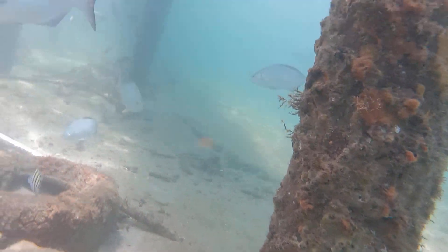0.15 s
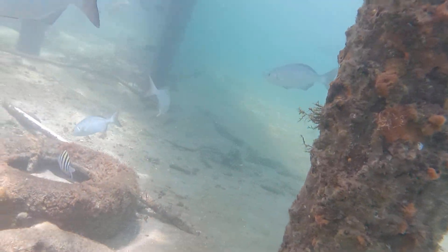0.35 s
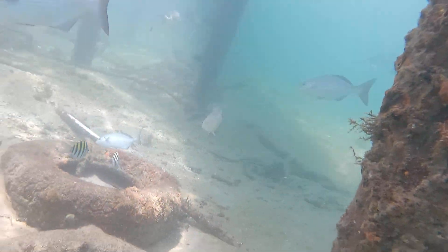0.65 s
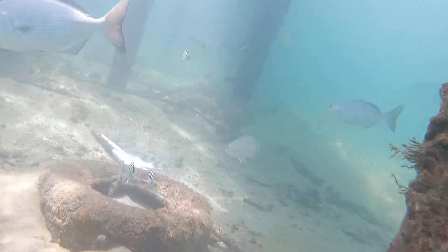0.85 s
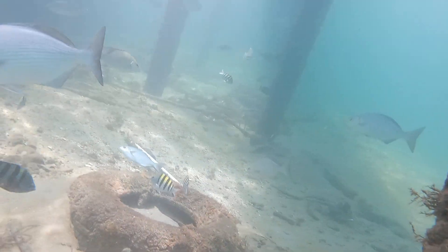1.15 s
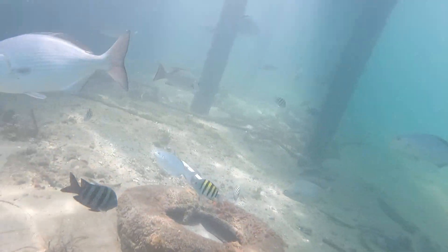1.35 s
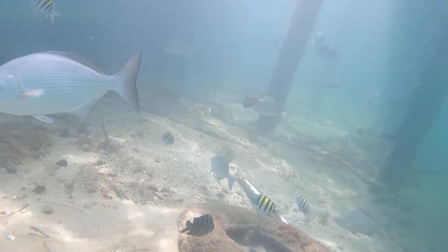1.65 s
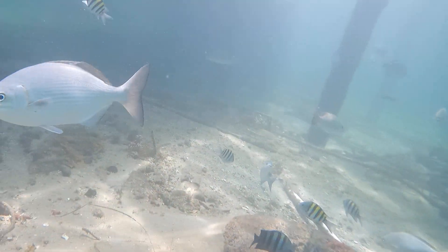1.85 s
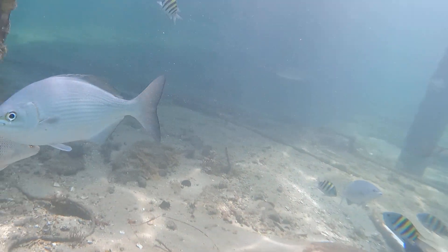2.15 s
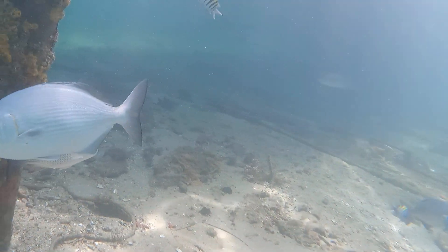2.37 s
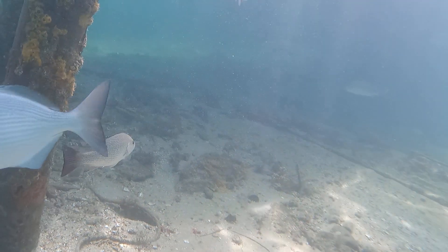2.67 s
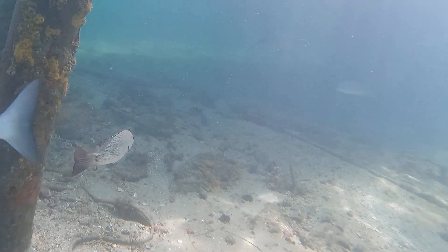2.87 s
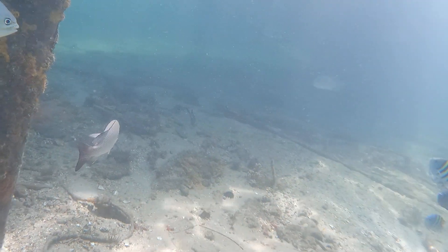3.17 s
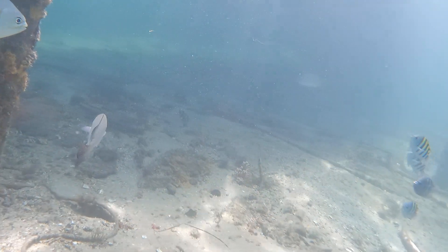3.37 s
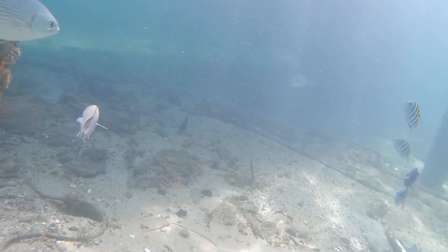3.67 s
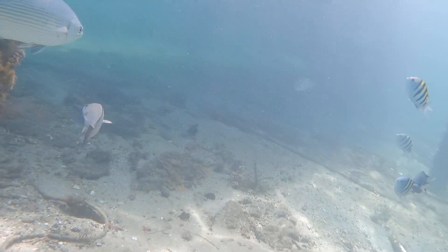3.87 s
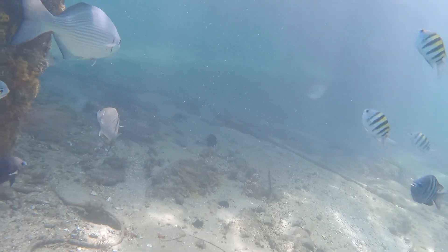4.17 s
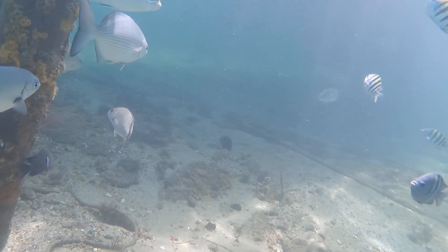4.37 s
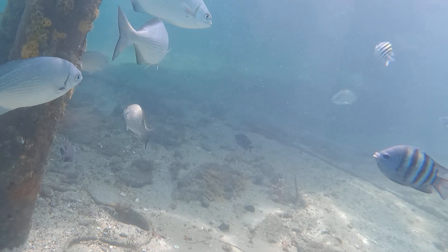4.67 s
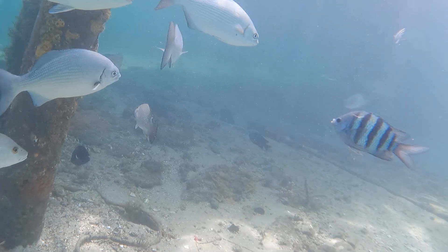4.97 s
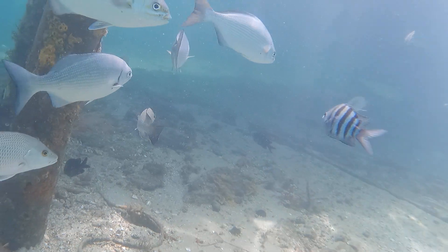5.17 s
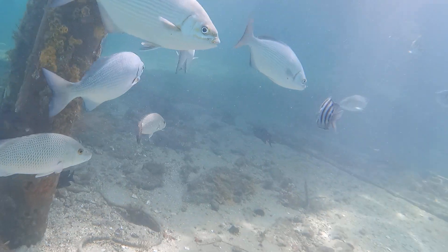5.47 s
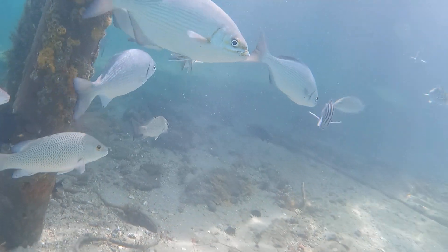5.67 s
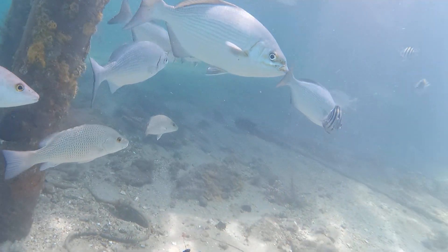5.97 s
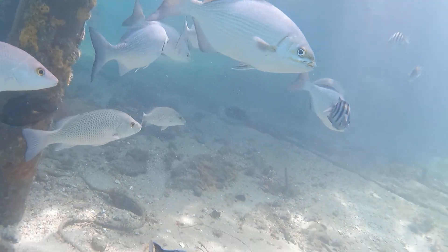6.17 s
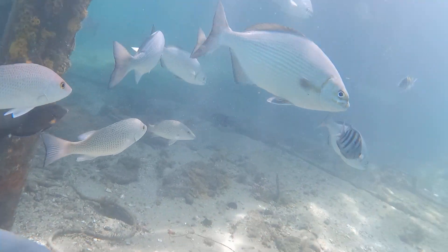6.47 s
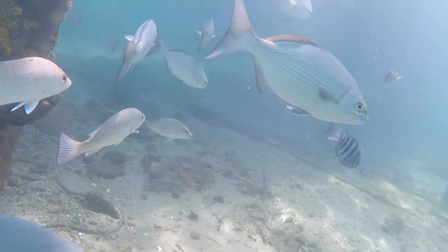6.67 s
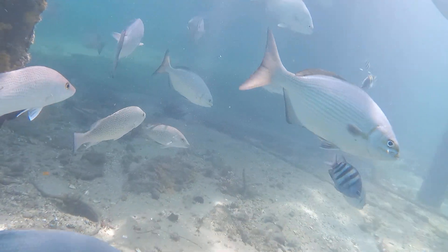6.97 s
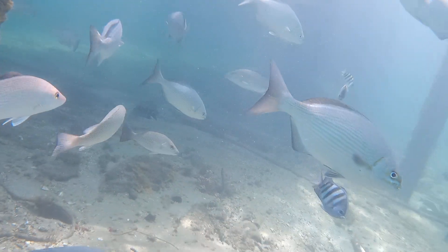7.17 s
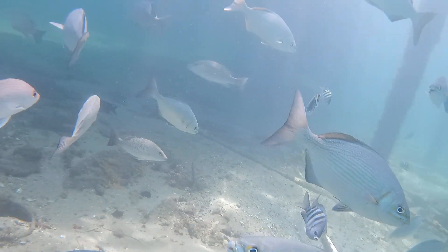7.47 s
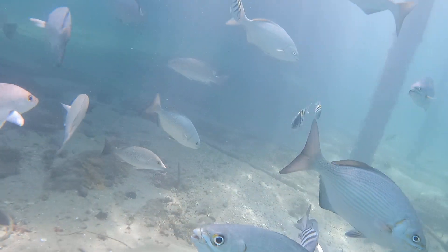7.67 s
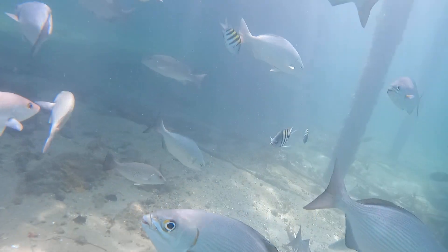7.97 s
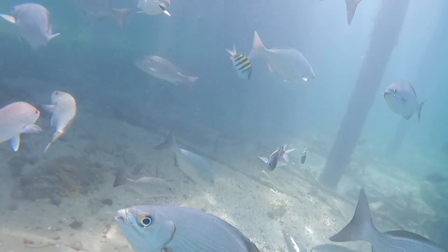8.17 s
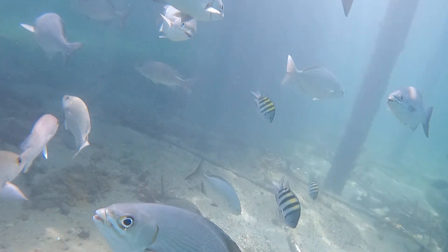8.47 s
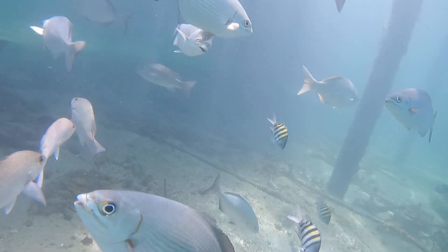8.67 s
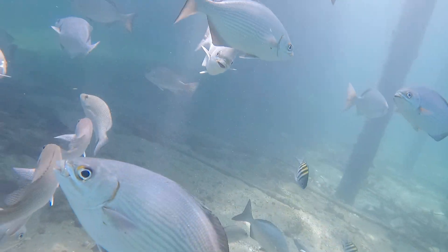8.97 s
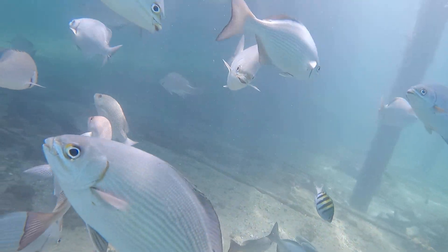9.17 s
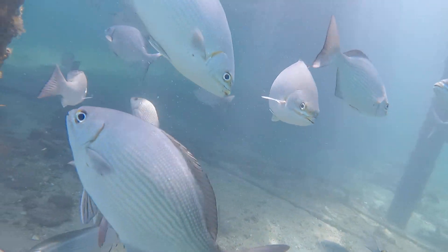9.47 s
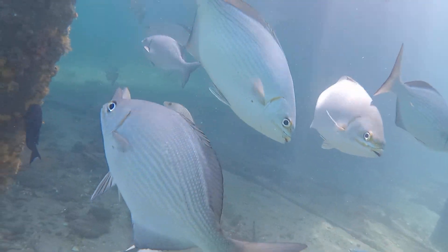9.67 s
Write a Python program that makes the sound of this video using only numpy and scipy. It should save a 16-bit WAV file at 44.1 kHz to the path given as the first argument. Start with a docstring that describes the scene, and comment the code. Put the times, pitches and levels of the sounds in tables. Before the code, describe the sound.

Snapping shrimp click and pop all around a submerged microphone, over a low, wavering drone of boat engines and a soft wash of water. The snaps are thickest at first, mixed with thumps and scrapes from a hand on the waterproof housing, then grow sparser. A thin whine comes and goes, a few bubbles plink, and a faint rasp flutters midway. Two more brief clusters of snaps and bumps follow, all with a dull, boxy ring.

```python
"""A sealed camera under a pier. From the start two boat engines hum and beat; far shrimp crackle and tick.
For 2 s near snaps crowd in, ringing the case, while the hand bumps and scrapes the grip; then both thin out.
From 0.8 s a thin whine comes in bursts, from 2.7 s a few bubbles plink. At 4.5-6 s a narrow rasp flutters,
and the right channel briefly fades to a second microphone port; otherwise both channels carry the first.
Snaps and grip noise bunch again near 6.5 s and 9.6 s."""
import sys
import numpy as np
from scipy import signal
from scipy.fft import rfft, irfft, next_fast_len
from scipy.io import wavfile
from scipy.ndimage import map_coordinates

SR = 44100
rng = np.random.default_rng(int(sys.argv[2]) if len(sys.argv) > 2 else 0)


def store_pcm(level_fs):
    """Save levels as 16-bit WAV."""
    pcm = np.round(np.clip(level_fs, -1, 1) * 32767).astype(np.int16)
    wavfile.write(sys.argv[1], SR, np.atleast_2d(pcm).T)


N = 433499

# engine tones, fading as the swell moves the surface: t/s, level/dB
HUM_SHAFT_X2 = [(0.0, -47), (0.13, -34), (0.71, -27), (0.82, -30.5), (2.161, -24.5), (3.26, -39),
                (3.94, -35.5), (5.45, -48), (6.949, -27), (7.56, -38.5), (8.21, -27), (9.28, -32),
                (9.64, -44), (9.83, -40)]
HUM_SHAFT_X3 = [(0.0, -20), (0.079, -17), (0.19, -57), (0.38, -19.5), (0.79, -23), (0.87, -34), (1.04, -21),
                (1.311, -28.5), (2.35, -20), (2.432, -27.5), (3.94, -20), (4.24, -41.5), (4.82, -14),
                (4.98, -20), (5.23, -12), (5.941, -24), (6.18, -19), (6.841, -35), (7.12, -18), (7.58, -32),
                (7.72, -22), (7.88, -41), (8.43, -28), (8.51, -37), (8.93, -17), (9.06, -34), (9.331, -20),
                (9.46, -22), (9.53, -22), (9.62, -24), (9.83, -23)]
HUM_SECOND_ENGINE = [(0.0, -26), (0.3, -19.5), (0.41, -58), (0.57, -22.5), (0.63, -30), (1.119, -23),
                     (1.72, -45), (2.02, -27), (2.3, -32), (3.78, -23), (4.239, -31), (5.8, -48.5),
                     (5.89, -41), (6.069, -28.5), (7.34, -21), (7.86, -34), (8.43, -24), (8.65, -30),
                     (8.9, -30.5), (9.02, -39), (9.2, -30), (9.45, -19.5), (9.53, -34), (9.62, -21),
                     (9.83, -40)]
# nearer engine's overtones: shaft multiple, level/dB
OVERTONES = [(4, -45), (5, -50), (6, -53), (7, -54), (8, -56), (14, -56.5), (15, -59), (16, -55)]
# background levels: t/s, crackle/dB, wash/dB, rumble/dB
BACKGROUND = [(0.0, -36, -43, -20), (0.19, -41.5, -43, -27), (0.66, -39.5, -42.5, -26),
              (0.82, -40.5, -38.5, -24.5), (1.07, -42, -41.5, -27.5), (1.29, -40.5, -39, -21.5),
              (1.45, -42.5, -43.5, -26), (1.91, -40.5, -41, -26), (4.08, -47, -44, -32),
              (4.54, -45, -42.5, -26.5), (5.17, -47.5, -41.5, -29.5), (5.83, -51, -48, -34),
              (6.21, -46.5, -47.5, -31.5), (6.54, -43.5, -42, -28.5), (7.39, -45, -45.5, -32),
              (8.73, -42.5, -41, -30), (9.36, -44, -43.5, -35.5), (9.83, -44.5, -41, -27)]
# noise spectra: f/Hz, density/dB
RUMBLE_SPECTRUM = [(20, -14.5), (45, -14), (62, -5.5), (90, 2.5), (125, 0), (160, -9.5), (300, -21),
                   (420, -37), (700, -120)]
WASH_SPECTRUM = [(150, -39), (300, -4), (450, -3.5), (520, 0.5), (650, -0.5), (780, -3.5), (870, -16),
                 (1200, -18), (2000, -31.5), (4000, -49), (9800, -48), (11200, -91.5)]
# whine bursts: t/s, length/s, level/dB
WHINES = [(0.797, 0.32, -47), (1.878, 0.23, -40.5), (2.698, 0.46, -47.5), (3.35, 0.29, -46.5),
          (4.01, 0.78, -50.5), (4.784, 0.76, -48), (6.096, 0.88, -46.5), (7.493, 0.6, -48),
          (8.303, 0.68, -47)]
# rasp envelope: t/s, level/dB
RASP_LEVEL = [(4.5, -49), (4.554, -50.5), (4.688, -52), (4.87, -61.5), (5.288, -50), (5.36, -56),
              (5.518, -56.5), (5.664, -68.5), (6.0, -60.5)]
# case modes, grouped low, mid, upper, treble: f/Hz, width/Hz, gain/dB
CASE_MODES = [
    [(413, 380, 1.5), (710, 655, 4.5)],
    [(1027, 270, -4), (1454, 170, 0), (1723, 480, 3)],
    [(2312, 202, -2.5), (2735, 782, 10.5), (3179, 1180, 11.5), (4480, 890, -8)],
    [(4720, 290, -6.5), (5464, 730, 6), (5940, 685, 7), (8650, 1600, -3.5)],
]
# dry ticks: t/s, level/dB, mid offset/dB, treble offset/dB
TICKS = [(0.1492, -38, -5, -22), (0.3837, -32, 8, -26), (0.437, -23.5, -1, -26), (0.5236, -32, 1, -27),
         (1.3227, -26.5, 1, -9), (1.5299, -27, -3.5, -19), (1.6077, -27, 7, -28), (1.981, -29, -6, -13.5),
         (2.0231, -35, -8, -9), (2.1059, -35, -6, -9), (2.144, -29.5, 2, -31), (2.207, -29, -3, -25),
         (2.263, -27, -6, -22), (2.314, -33, -6, -32), (2.366, -26.5, 7, -31), (2.4723, -42, -9, -23),
         (2.814, -32, 2, -19), (2.9658, -40, 18, -37), (3.0543, -31.5, -2, -35), (3.103, -42, -3, -37),
         (3.1335, -41, -3, -31), (3.172, -33, -10, -37), (3.33, -35, -5.5, -25), (3.3703, -32.5, -5, -15),
         (3.3927, -31.5, 3, -21), (3.409, -28, -14, -36), (3.5065, -44, 5, -28), (3.5725, -29, 1, -20),
         (3.6549, -31, 5, -35), (3.7586, -33, 7.5, -25), (3.847, -30, -15, -26), (4.012, -30.5, -10, -25),
         (4.0754, -32.5, -2, -17.5), (4.1739, -25, -11, -37), (4.3158, -39, -10, -30),
         (4.362, -30, -7, -21), (4.742, -43, -5.5, -20), (4.7602, -30.5, 8, -26), (4.8396, -34, -5, -20),
         (5.2165, -26, -14, -24), (5.271, -33, -10, -21), (5.3124, -36, 3, -26), (5.88, -36, -5, -11),
         (5.9886, -38.5, -7, -16), (6.0418, -26, -12, -30), (6.205, -33, -7.5, -29), (6.2354, -35, 1, -14),
         (6.519, -29.5, -6, -28), (6.595, -33, 5, -24), (6.6355, -28.5, 11, -19), (6.6532, -22, 9.5, -33),
         (6.725, -33, -9, -24), (6.791, -28, -9, -31), (6.865, -35, -5, -20.5), (7.249, -38, -7, -11),
         (7.4383, -38, -5, -19), (7.5007, -41, -6, -29), (7.7174, -44, -1, -32), (7.734, -30, -3, -30),
         (7.836, -36.5, 0, -11), (7.9617, -36, -8, -35), (8.107, -35, -6, -22), (8.1658, -39, -1, -30),
         (8.2386, -28, -3, -34), (8.338, -33, -5, -22), (8.5575, -36, 10, -28), (8.5845, -40, -15, -31),
         (8.6025, -27, -13, -37), (8.755, -37, -1, -37), (9.0282, -42, 0, -33), (9.103, -37, -15, -30),
         (9.195, -37, 2, -26), (9.338, -31, -4, -37), (9.4963, -42, -2, -35), (9.5913, -35.5, -4, -25),
         (9.685, -33.5, 4, -37), (9.7426, -32, -5, -14)]
# bubbles: t/s, level/dB, f/Hz, t60/s
PLINKS = [(2.662, -12.5, 730, 0.028), (2.991, -17, 2540, 0.021), (2.992, -17.5, 1500, 0.046),
          (4.765, -31, 1476, 0.047), (5.101, -31, 1416, 0.091), (5.56, -34, 1500, 0.046),
          (9.42, -25, 1490, 0.051)]
# grip bumps, and the low thud under a few snaps: t/s, level/dB, f/Hz, t60/s
BUMPS = [(0.237, -34, 203, 0.073), (0.269, -30.5, 36, 0.37), (0.849, -12.5, 32.6, 0.3),
         (0.9, -14.5, 243, 0.028), (1.19, -20, 33.5, 0.14), (1.342, -13, 200, 0.028),
         (1.437, -11.5, 49, 0.12), (2.386, -24, 593, 0.016), (2.989, -24, 780, 0.027),
         (4.512, -23, 340, 0.023), (4.615, -11, 242, 0.012), (4.641, -8, 220.9, 0.02),
         (4.695, -22.5, 590, 0.013), (6.477, -4, 344, 0.0051), (6.507, -19, 182, 0.046),
         (6.616, -11, 47.2, 0.07), (6.653, -24, 520, 0.016), (7.235, -29, 346, 0.032),
         (8.051, -34, 38.6, 0.18), (9.063, -19, 54, 0.24), (9.607, -22, 373, 0.016),
         (9.619, -19.5, 31.4, 0.088)]
# grip scrapes: t/s, length/s, level/dB, ring f/Hz
SCRAPES = [(0.212, 0.064, -31, 2180), (0.279, 0.048, -33.5, 2460), (0.52, 0.035, -37, 2300),
           (0.613, 0.037, -40, 2440), (0.666, .09, -41, 2380), (0.764, 0.032, -26, 2450),
           (0.833, 0.077, -30.5, 2240), (0.92, 0.062, -37, 2390), (1.273, 0.031, -37, 2260),
           (1.311, 0.052, -33, 2200), (1.376, 0.09, -33.5, 2730), (1.659, 0.026, -42, 2340),
           (1.871, 0.044, -29.5, 2530), (6.402, 0.03, -39.5, 2900), (6.44, 0.04, -38.5, 2030),
           (6.498, 0.025, -37.5, 1220), (7.218, 0.043, -39.5, 1530), (9.6, 0.048, -40, 2300)]
# near snaps: t/s, level/dB, ring f/Hz, low offset/dB, upper offset/dB, treble offset/dB
SNAPS = [(0.032, -28, 1010, -10, 0.5, -24), (0.216, -18.5, 1236, -11, -12, -25.5),
         (0.237, -15.5, 1160, -17, -21, -26), (0.2458, -19, 1010, 1, -14, -28),
         (0.2559, -20, 1480, -7.5, -15, -34), (0.288, -28, 1540, 0, -3, -20),
         (0.3107, -21, 1480, -5.5, -6.5, -30), (0.3216, -11.5, 2150, -18, -24, -31.5),
         (0.3583, -22.5, 2470, -4.5, -21, -38), (0.416, -13, 1510, -10, -14.5, -33),
         (0.4486, -14.5, 1205, -7.5, -5.5, -36), (0.493, -19, 1460, -30, -18, -41.5),
         (0.6121, -13.5, 1570, -12, -23, -34), (0.641, -19.5, 2520, -8, -7.5, -28),
         (0.665, -16.5, 1400, -9, -5, -28), (0.6889, -13, 2300, -22, -12, -21.5),
         (0.7143, -15, 1210, -20, -10, -41), (0.731, -18.5, 2200, -9.5, -18, -39),
         (0.775, -11, 2360, -10, -30, -31), (0.7828, -10.5, 2240, -23, -9, -18.5),
         (0.8178, -19, 2350, -15, -10, -27), (0.8548, -13.5, 1080, -19, -16, -31),
         (0.8617, -7, 1190, -14, -17, -23.5), (0.8732, -16.5, 1180, -11, -18.5, -32),
         (0.8871, -14, 2190, -24, -9, -29), (0.8987, -15, 2280, -6, -16, -30),
         (0.9356, -33, 1400, -16, -22, -24), (0.9841, -22, 1400, -3, -32, -44),
         (1.0467, -20.5, 1530, -19, 0.5, -33), (1.0994, -26.5, 2340, -5, -6, -39),
         (1.1682, -24.5, 1590, 0.5, -5.5, -19), (1.269, -25.5, 1420, 1, -21, -29),
         (1.2836, -14, 2220, -19, -21, -42), (1.2947, -19, 1490, -2, -23, -34),
         (1.342, -10, 1370, -5, -23, -52), (1.379, -20.5, 1090, -5, -14, -37),
         (1.403, -12.5, 1430, -7, -2, -31), (1.427, -15, 1400, -11, -14, -28),
         (1.441, -8, 1500, -19, -11.5, -33), (1.4586, -15.5, 2210, -8, -23, -34),
         (1.521, -15.5, 1620, -2, -9, -35), (1.547, -12, 1230, -32, -14, -21),
         (1.5809, -14.5, 1200, -10, -3, -38), (1.6337, -10, 1350, -24, -25, -46),
         (1.6497, -16, 1240, -11, -13, -40), (1.6737, -11.5, 2160, -6, -7.5, -29),
         (1.8443, -19.5, 2370, -11, -4, -20), (1.8831, -21.5, 1900, -10, -22.5, -38),
         (1.8963, -19, 2450, -14, -4, -23.5), (1.9245, -15.5, 1510, -20, -8, -32),
         (2.0037, -39.5, 1600, -4, 10.5, -8), (2.1679, -22, 1400, -36, 3, -26.5),
         (2.2398, -17, 1430, -15, -14, -38), (2.3831, -15.5, 1270, -10.5, -21, -47),
         (2.395, -26, 1420, -15, -20.5, -38), (2.593, -27, 1450, -9, -2, -36),
         (2.651, -37, 2380, 11, -11, -50), (2.66, -11.5, 1595, -14, -18, -42),
         (2.6773, -16, 1410, -15, -15, -39), (2.6954, -24, 1230, -27, -3, -26.5),
         (2.928, -24, 1180, -13, -33, -39), (2.9881, -7.5, 1510, -20.5, -18, -49),
         (3.2918, -21.5, 1650, -13, -4.5, -28.5), (3.3083, -32, 2370, -11, 4, -39),
         (3.3505, -31, 1380, -8, -5, -25.5), (3.612, -25.5, 1580, -17, -14, -45.5),
         (3.672, -21, 1460, -9, -10.5, -38), (3.775, -28.5, 1515, -13, 1, -24),
         (3.7927, -16.5, 2370, -24, -6, -32), (3.988, -27.5, 1380, -15, -9, -30),
         (4.2507, -31, 1420, -21, 2, -30), (4.333, -35.5, 1370, -13, 3.5, -22),
         (4.6444, -30, 1610, -9, 0, -19), (4.773, -41, 1220, -8, -8.5, -23),
         (4.7866, -27.5, 993, -17, -3, -27), (5.098, -20.5, 1490, -23.5, -16, -38),
         (5.2283, -27.5, 1470, -5.5, -3, -22.5), (5.448, -26.5, 1590, -11, -27, -28),
         (5.642, -26, 940, -15, -31, -34.5), (5.7614, -27, 1350, -12, -13.5, -29),
         (5.8492, -27, 2640, -25, -1.5, -43), (6.063, -32, 1045, -20, -4.5, -29),
         (6.324, -24.5, 1370, -3.5, -13, -30), (6.4042, -27.5, 1620, -19, -2, -31.5),
         (6.4295, -31, 1740, -4, -18.5, -27), (6.451, -29.5, 1200, -5, -15, -20),
         (6.46, -23, 895, -8.5, -8, -36), (6.474, -19.5, 1530, -19, -16, -43),
         (6.5035, -21, 1300, 4, -24, -37), (6.6187, -21, 1470, -3.5, -10, -29),
         (6.6527, -14, 1390, -1.5, -16, -42), (6.7633, -23.5, 1490, -27.5, -3.5, -26),
         (6.8356, -35, 2370, -10, -6, -30), (6.95, -29.5, 1430, -2.5, -4.5, -25),
         (7.066, -34, 1680, -5, -0.5, -36), (7.232, -24.5, 1400, -12, -17, -40),
         (7.2401, -23, 1660, -5, -14, -38), (7.2542, -29, 993, -6, -12, -28),
         (7.329, -19, 1450, -6.5, -7.5, -30), (7.4114, -28.5, 1240, -13, -18, -36),
         (7.4746, -22, 1450, -25, -6.5, -25), (7.642, -25, 1380, -12, -14, -35),
         (7.75, -27.5, 1390, -24, -4, -33), (7.9327, -29, 1420, -10, -3, -30),
         (8.0323, -19.5, 1410, -9, -14, -53), (8.065, -29.5, 1400, -4, -7, -37),
         (8.198, -26.5, 1150, -12.5, -12, -42), (8.209, -21.5, 1450, -11, -5.5, -28),
         (8.327, -20.5, 1410, -2, -8.5, -33), (8.3786, -23, 1360, -5, -3.5, -30),
         (8.5022, -22.5, 1460, -0.5, -8, -28), (8.7232, -26, 1460, -20, -5.5, -27),
         (8.799, -25, 1510, -14, -7, -43), (8.8284, -26.5, 1480, -17, -1, -41),
         (8.876, -28.5, 1470, -4, -12.5, -38), (8.95, -33.5, 1440, -8, 4.5, -12.5),
         (9.121, -21.5, 2540, -11, -10, -37), (9.2098, -27.5, 1340, -5, -9, -30),
         (9.417, -20.5, 1550, -18, -25, -43), (9.605, -17.5, 2180, -4, -10.5, -24),
         (9.62, -16, 1210, -9, -12, -32), (9.646, -30.5, 1430, 0, 1.5, -38),
         (9.7266, -23, 1580, -19, -6.5, -31)]
# second port re first: f/Hz, gain/dB, lead/rad
PORT_RESPONSE = [(0, -1.6, 0), (900, -3, 1), (1200, -10, -.3), (1480, 2, .7), (1750, 1, 2.8), (2000, 10, 6),
                 (2250, 3, 5.4), (2700, 2.5, 7), (3000, -6, 6.5), (3400, 4, 5), (4200, 12, 5.8),
                 (6300, 8, 8), (7100, 17, 8.4), (8600, 11, 8.4)]

# drive per case group; ticks skip the low one
CRACKLE_DRIVE_DB, TICK_DRIVE_DB = [-3, 3.5, 3, 16], [-2, 4, 17]
SCRAPE_DRIVE_DB, SNAP_DRIVE_DB = [1.5, 4.5, 1, -1], [8, -6.5, 8, 19]
SHAFT_HZ, SECOND_ENGINE_HZ = 36.5, 101.7
TIME_S = np.arange(N) / SR


def amp(db):
    """dB to gain."""
    return 10 ** (np.asarray(db) / 20)


def unit(x):
    """Scale to rms 1."""
    return x / np.sqrt(np.mean(x ** 2) + 1e-20)


def curves(rows):
    """Per-sample curve of each column after t/s."""
    t_s, *columns = np.transpose(rows)
    return [np.interp(TIME_S, t_s, column) for column in columns]


def wobble(rate_hz):
    """Smooth random curve, knots at rate_hz."""
    knots = rng.standard_normal(int(N * rate_hz / SR) + 4)
    return map_coordinates(knots, [np.arange(N) * rate_hz / SR])


def filtered(x, response):
    """Apply a complex response of f/Hz."""
    size = next_fast_len(N + SR // 2)
    return irfft(rfft(x, size) * response(np.fft.rfftfreq(size, 1 / SR)), size)[..., :N]


def tone(hz, rms_db):
    """Sine of moving pitch and level."""
    return np.sqrt(2) * amp(rms_db) * np.sin(2 * np.pi * np.cumsum(hz) / SR)


def noise(spectrum):
    """Coloured noise, rms 1; spectrum interpolated over log f."""
    hz, db = np.transpose(spectrum)
    colour = lambda f: amp(np.interp(np.log(f + 1), np.log(hz + 1), db))
    return unit(filtered(rng.standard_normal(N), colour))


def damped_sine(hz, width_hz, t_s):
    """Impulse response of one resonance."""
    return np.exp(-np.pi * width_hz * t_s) * np.sin(2 * np.pi * hz * t_s)


def case_ring(drive):
    """Camera case resonances; one drive row per mode group."""
    def response(f):
        modes = [sum((-1) ** k * amp(db) * 1j * f * SR / (2 * np.pi) / (hz**2 - f**2 + 1j * f * width_hz)
                     for k, (hz, width_hz, db) in enumerate(group)) for group in CASE_MODES]
        membrane = 1 / (1 + 1j * f / 4500) ** 3  # wet, so it loses treble
        edge_hz = np.array([[1600], [3200], [7000], [14000]])
        rolloff = 1 / (1 - (f / edge_hz) ** 2 + 1.4j * f / edge_hz)
        return modes * membrane * rolloff
    return filtered(drive, response).sum(axis=0)


def water(rumble_db, wash_db):
    """Engine rumble and wash: two wavering noise beds."""
    rumble = amp(rumble_db + 1.9 * wobble(8.7)) * noise(RUMBLE_SPECTRUM)
    wash = amp(wash_db + 0.8 * wobble(8.9)) * noise(WASH_SPECTRUM)
    return rumble + wash


def engines():
    """Shaft harmonics of one engine; the third beats with the second engine's tone."""
    tones = (2 * SHAFT_HZ, HUM_SHAFT_X2), (3 * SHAFT_HZ, HUM_SHAFT_X3), (SECOND_ENGINE_HZ, HUM_SECOND_ENGINE)
    hum = sum(tone(hz * (1 + .004 * wobble(3)), curves(level)[0] + 1.1 * wobble(20))
              for hz, level in tones)
    shaft_hz = SHAFT_HZ + .25 * wobble(10)
    return hum + sum(tone(k * shaft_hz, db + 2.5 * wobble(5)) for k, db in OVERTONES)


def whine(start_hz=653.5, rise_hz=12, fade_s=0.11):
    """Thin tone bursts, each climbing ever faster."""
    waver_hz, flutter_db = 3 * wobble(25), 2.5 * wobble(14)
    out = np.zeros(N)
    for t_s, length_s, db in WHINES:
        age_s = TIME_S - t_s
        gate = np.clip(np.minimum(age_s, length_s - age_s) / fade_s, 0, 1)
        climb_hz = rise_hz * np.clip(age_s / length_s, 0, 1) ** 2
        out += gate * tone(start_hz + climb_hz + waver_hz, db + flutter_db)
    return out


def rasp(hz=1481, width_hz=74, fade_s=.1):
    """Fluttering noise in one narrow resonance."""
    gate = np.clip(np.minimum(TIME_S - RASP_LEVEL[0][0], RASP_LEVEL[-1][0] - TIME_S) / fade_s, 0, 1)
    resonance = lambda f: (f * width_hz / (hz ** 2 - f * f + 1j * f * width_hz)) ** 2
    band = unit(filtered(rng.standard_normal(N), resonance))
    return gate * amp(curves(RASP_LEVEL)[0] + 3.5 * wobble(22)) * band


def far_crackle(level_db, clicks_per_s=250, treble_db=-25):
    """Many far shrimp, smeared by echoes off piles and sand, shake the case."""
    when, size = rng.random((int(clicks_per_s * N / SR), 2)).T
    colour_db = 3.2 * rng.standard_normal((len(CASE_MODES), len(when)))
    size_db = -4.5 * np.log(size + .04)  # many small, few large
    click_power = [np.bincount((when * N).astype(int), amp(size_db + db) ** 2, N) for db in colour_db]
    t_s = np.arange(SR // 20) / SR
    echoes = (1 - np.exp(-t_s / 0.00056)) * np.exp(-t_s / 0.0021) + 0.052 * np.exp(-t_s / 0.01)
    power = np.abs(signal.fftconvolve(click_power, echoes[None], axes=1)[:, :N])
    drive = np.sqrt(power + 0.3 * np.mean(power)) * rng.standard_normal(power.shape)
    drive[-1] *= amp(treble_db)
    crackle = case_ring(amp(CRACKLE_DRIVE_DB)[:, None] * drive)
    # the surface reflection cancels a narrow band
    notch = lambda f: 1 - .75j * f * 400 / (2040 ** 2 - f * f + 1j * f * 400)
    return amp(level_db + 1.4 * wobble(12)) * unit(filtered(crackle, notch))


def far_pips(crackle_db, offset_db=-31, pips_per_s=50, spread_db=3.5, decay_ms=.8):
    """Tiny treble snaps of far shrimp, in loose flurries."""
    when, size = rng.random((int(pips_per_s * N / SR), 2)).T
    clicks = np.bincount((when * N).astype(int), amp(-spread_db * np.log(size + .01)), N)
    t_ms = np.arange(SR // 100) * 1000 / SR
    envelope = np.convolve(clicks, np.exp(-t_ms / decay_ms) + .1 * np.exp(-t_ms / 4))[:N]
    highpass = lambda f: (1j * f / 3500 / (1 + 1j * f / 3500)) ** 4
    band = lambda f: highpass(f) / (1 - (f / 6000) ** 2 + .8j * f / 6000) ** 2
    gain = amp(crackle_db + offset_db + 3 * wobble(6))
    return gain * unit(filtered(envelope * rng.standard_normal(N), band))


def shrimp_ticks(decay_ms=1):
    """Very short noise bursts into the top three case groups."""
    t_ms = np.arange(SR // 50) * 1000 / SR
    envelope = np.exp(-t_ms / decay_ms) + 0.12 * np.exp(-t_ms / 6)
    drive = np.zeros((len(CASE_MODES), N + SR))
    for t_s, db, mid_db, treble_db in TICKS:
        burst = rng.standard_normal(len(t_ms)) * envelope
        gains = amp(db + np.add(TICK_DRIVE_DB, [mid_db, 0, treble_db]))
        start = round(t_s * SR)
        drive[1:, start:start + len(t_ms)] += gains[:, None] * burst / np.linalg.norm(burst)
    return case_ring(drive[:, :N])


def bubble_plinks(rise_s=0.00079):
    """Small bubbles ring as damped sines with a soft onset."""
    out, age_s = np.zeros(N + SR), np.arange(SR // 8) / SR
    for t_s, db, hz, t60_s in PLINKS:
        envelope = amp(db - 60 * age_s / t60_s) * (1 - np.exp(-age_s / rise_s))
        out[round(t_s * SR):][:len(age_s)] += envelope * np.sin(2 * np.pi * hz * age_s)
    return out[:N]


def low_bumps(sag=0.28):
    """Soft pushes on the case, and the low thud under a few snaps: damped swings of sagging pitch."""
    out, age_s = np.zeros(N + SR), np.arange(SR // 2) / SR
    for t_s, db, hz, t60_s in BUMPS:
        swing = np.sin(2 * np.pi * hz * age_s * (1 - sag * age_s / (age_s + t60_s)))
        envelope = 2 * amp(db - 60 * age_s / t60_s) * (1 - np.exp(-3 * hz * age_s))
        out[round(t_s * SR):][:len(age_s)] += envelope * swing
    return out[:N]


def grip_scrapes(grains_per_s=2400, ring_width_hz=130, ring_db=-2):
    """The hand shifts: uneven grains shake the case and ring a spot of the grip."""
    hits = rng.random(N) < grains_per_s / SR
    grains = hits * rng.standard_normal(N) * (.5 + rng.exponential(1, N))
    dull_skin = lambda f: 1 / (1 + (f / 3800) ** 6) + .12 / (1 + (f / 6800) ** 10)
    body = filtered(case_ring(amp(SCRAPE_DRIVE_DB)[:, None] * grains), dull_skin)
    out, age_s = np.zeros(N), np.arange(SR // 50) / SR
    for t_s, length_s, db, hz in SCRAPES:
        span = slice(round(t_s * SR), round((t_s + length_s) * SR))
        ring = signal.lfilter(damped_sine(hz, ring_width_hz, age_s), 1, grains[span])
        crunch = unit(body[span]) + amp(ring_db) * unit(ring)
        out[span] += amp(db) * np.sqrt(np.hanning(len(crunch))) * crunch
    return out


def noise_spike(t_ms, rise_ms, decay_ms):
    """Noise under a two-sided exponential peaking at t_ms = 0."""
    return np.exp(-np.abs(t_ms) / np.where(t_ms < 0, rise_ms, decay_ms)) * rng.standard_normal(len(t_ms))


def near_snaps(peak_delay_ms=1.062, core=0.64, ring_width_hz=170, ring_db=-3.5, crack_db=-12, tip_db=-2.5):
    """Near shrimp: a sharp-cored burst rings the case and its own pitch; crack and tip skip the case."""
    lead = SR // 50
    age_s = np.arange(SR // 12) / SR
    t_ms = 1000 * (age_s - lead / SR) - peak_delay_ms
    decay_ms = 2.8 * np.array([[.8], [.55], [.5], [.45], [.25]])  # own ring, then the case groups
    rise = np.exp(-np.abs(t_ms) / (0.26 * decay_ms)) + 0.29 * np.exp(-np.abs(t_ms) / 6)
    fall = np.exp(-np.abs(t_ms) / decay_ms) + 0.16 * np.exp(-np.abs(t_ms) / 14)
    envelope = np.where(t_ms < 0, rise, fall)
    drive = np.zeros((len(CASE_MODES), N + SR))
    rings, tips, cracks = np.zeros((3, N + SR))
    for t_s, db, hz, low_db, upper_db, treble_db in SNAPS:
        burst = rng.standard_normal(envelope.shape) * envelope
        burst /= np.linalg.norm(burst, axis=1)[:, None]
        burst[:, np.argmin(np.abs(t_ms))] += core * rng.choice([-1, 1])
        span = slice(round(t_s * SR), round(t_s * SR) + len(t_ms))
        gains = amp(db + np.add(SNAP_DRIVE_DB, [low_db, 0, upper_db, treble_db]))
        drive[:, span] += gains[:, None] * burst[1:]
        ring = signal.fftconvolve(burst[0], damped_sine(hz, ring_width_hz, age_s))[:len(t_ms)]
        rings[span] += amp(db + ring_db) * ring / np.abs(ring).max()
        tips[span] += amp(db + treble_db + tip_db) * noise_spike(t_ms, rise_ms=.6, decay_ms=1.6)
        cracks[span] += amp(db + crack_db) * noise_spike(t_ms, rise_ms=.7, decay_ms=1.1)
    ring_band = lambda f: 1 / (1 + (f / 3500) ** 6)
    crack_band = lambda f: 3 / (1 + (700 / (f + 1)) ** 4) / (1 + (f / 2700) ** 8)
    tip_band = lambda f: 1 / (1 + (7200 / (f + 1)) ** 8) / (1 + (f / 10500) ** 8)
    heard = slice(lead, N + lead)
    return (case_ring(drive[:, heard]) + filtered(rings[heard], ring_band)
            + filtered(cracks[heard], crack_band) + filtered(tips[heard], tip_band))


def scene():
    """Both microphone ports; the second has its own colour and phase."""
    crackle_db, wash_db, rumble_db = curves(BACKGROUND)
    first = engines() + whine() + water(rumble_db, wash_db) + far_crackle(crackle_db)
    first += near_snaps() + low_bumps() + shrimp_ticks() + rasp()
    first += far_pips(crackle_db) + grip_scrapes() + bubble_plinks()
    hz, db, lead_rad = np.transpose(PORT_RESPONSE)
    second = filtered(first, lambda f: amp(np.interp(f, hz, db)) * np.exp(1j * np.interp(f, hz, lead_rad)))
    return np.array([first, second])


def record(dry, open_s=4.576, rise_s=0.22, close_s=5.7, fall_db_per_s=35.5, top_hz=15600):
    """Right channel fades to the second port and back; both are band-limited."""
    first, second = dry
    opening = 1 - np.exp(-np.maximum(TIME_S - open_s, 0) / rise_s)
    closing = amp(-fall_db_per_s * np.maximum(TIME_S - close_s, 0))
    right = first + opening * closing * (second - first)
    return filtered(np.array([first, right]), lambda f: (f < top_hz) / (1 + 1j * f / 11000) ** 4)


dry = scene()
out = record(dry)
store_pcm(out)
```